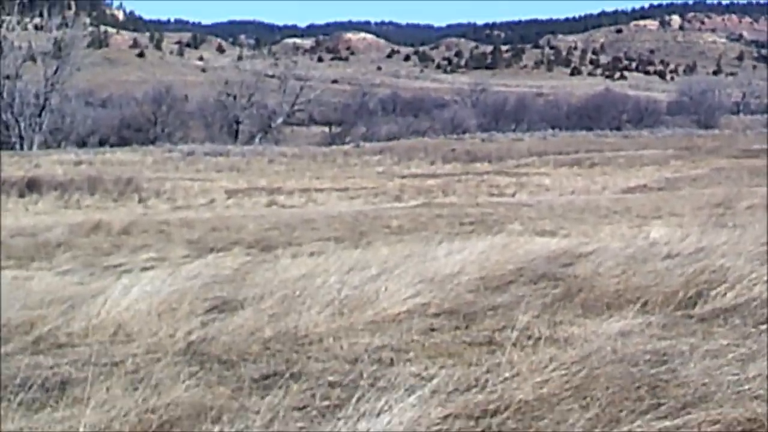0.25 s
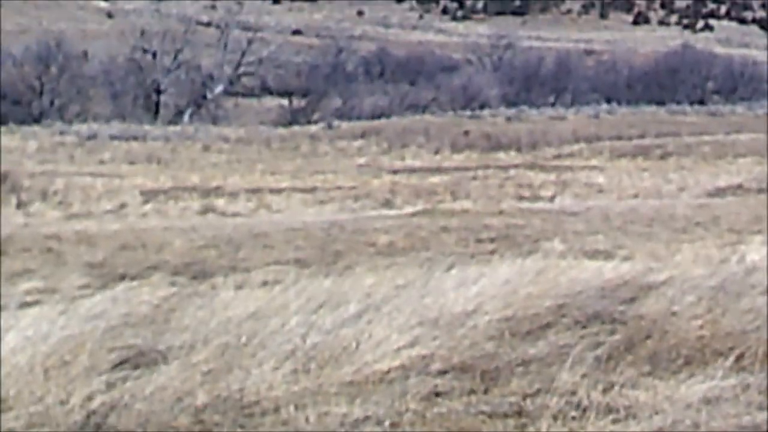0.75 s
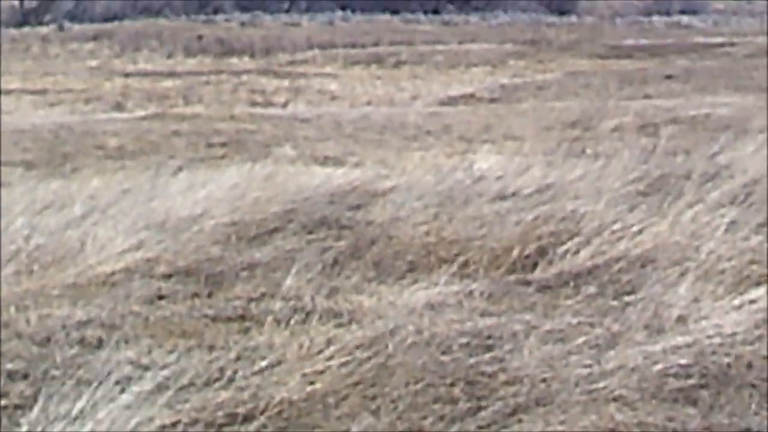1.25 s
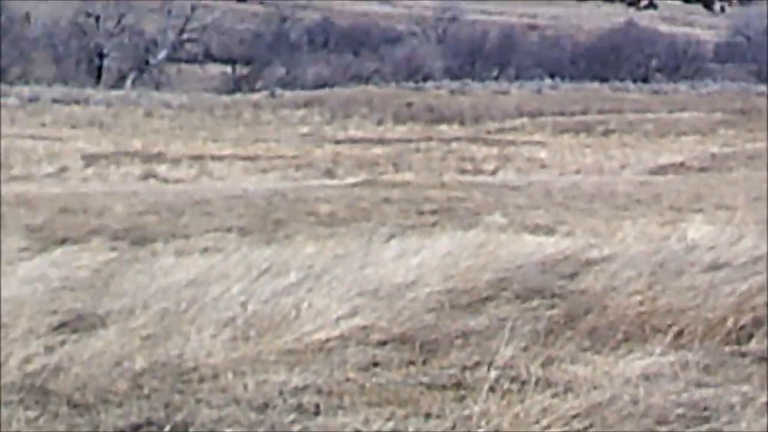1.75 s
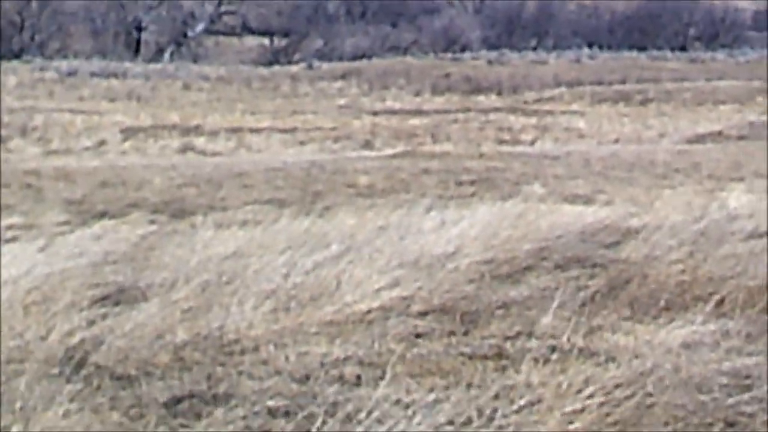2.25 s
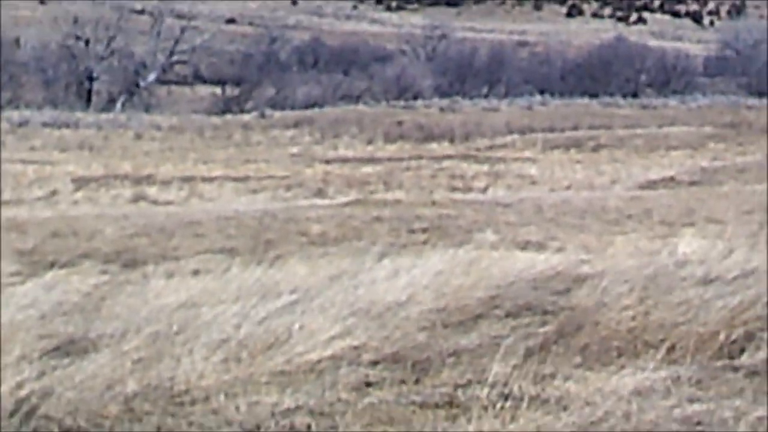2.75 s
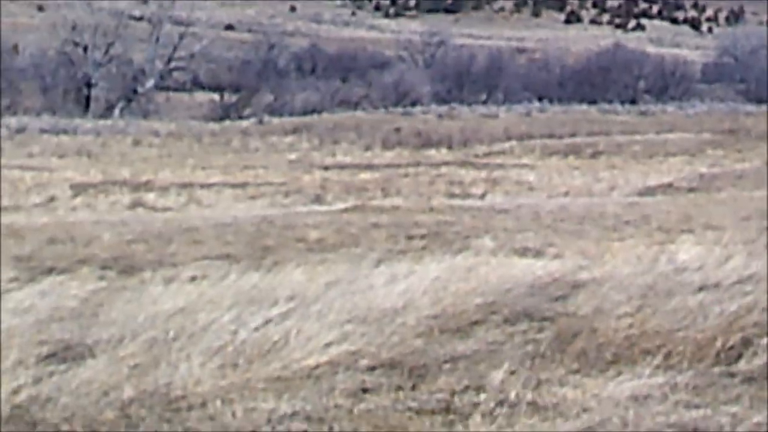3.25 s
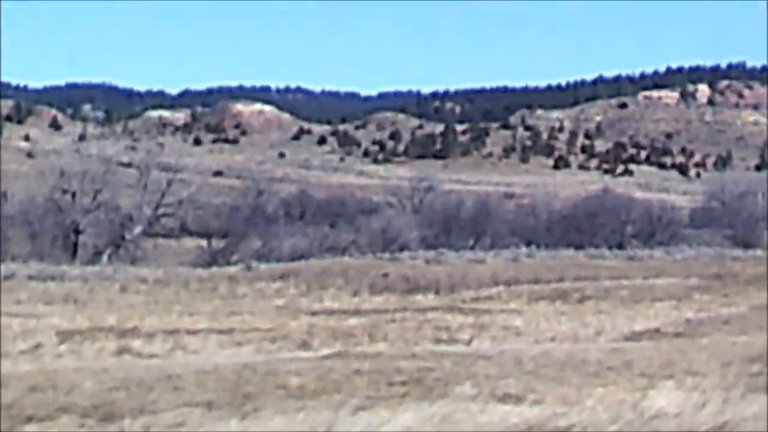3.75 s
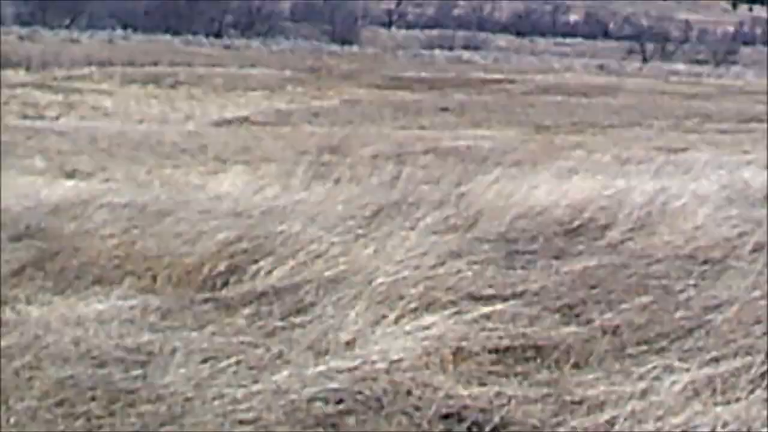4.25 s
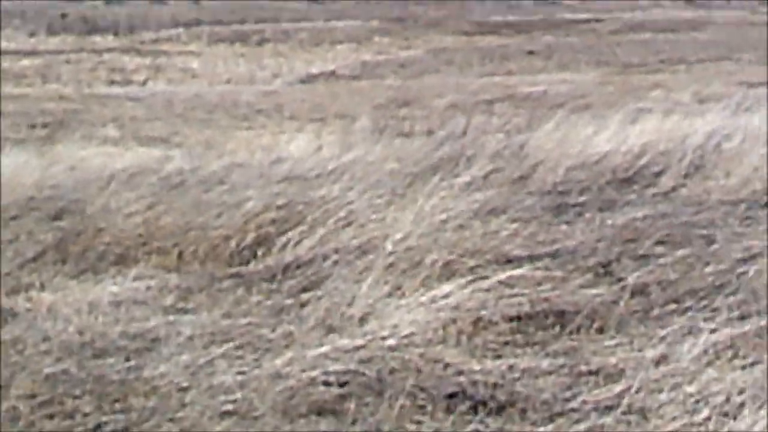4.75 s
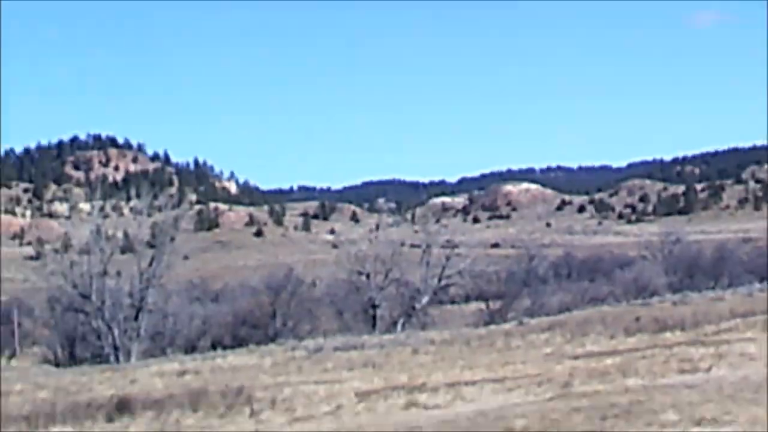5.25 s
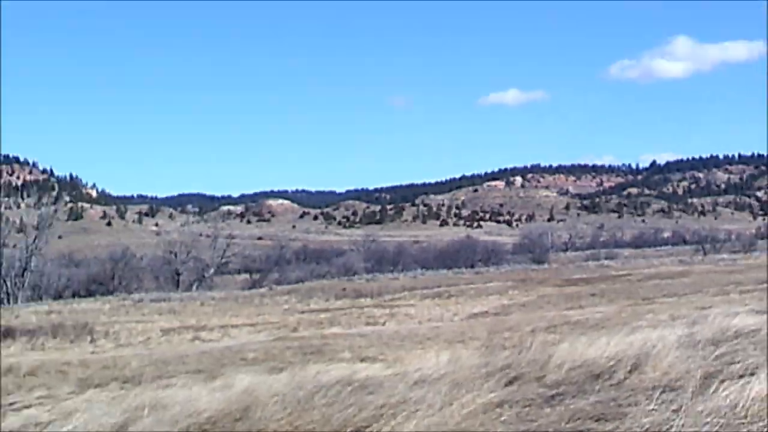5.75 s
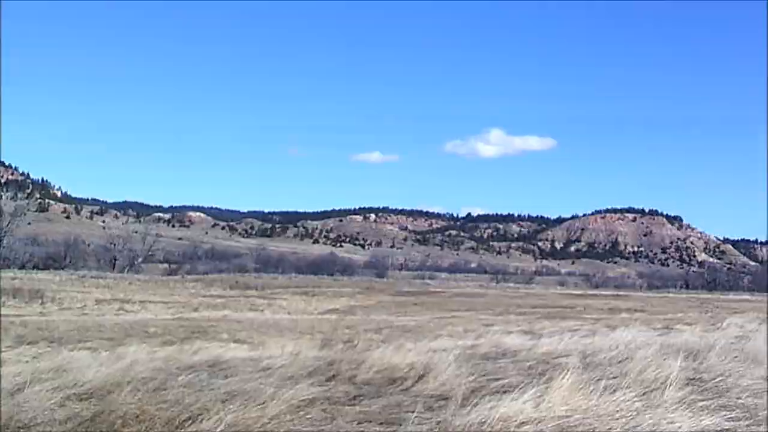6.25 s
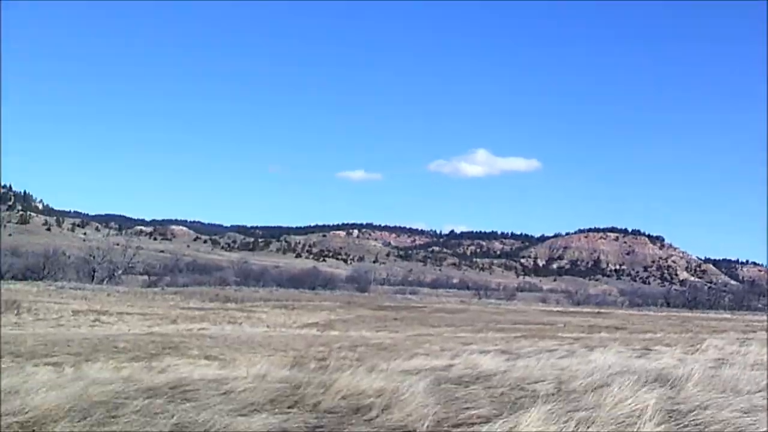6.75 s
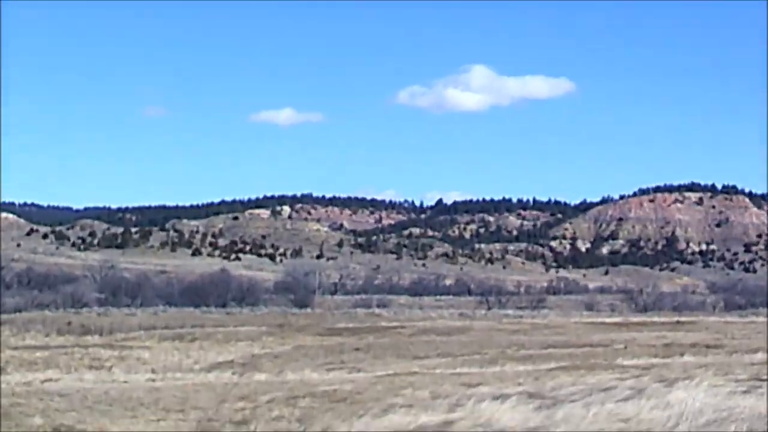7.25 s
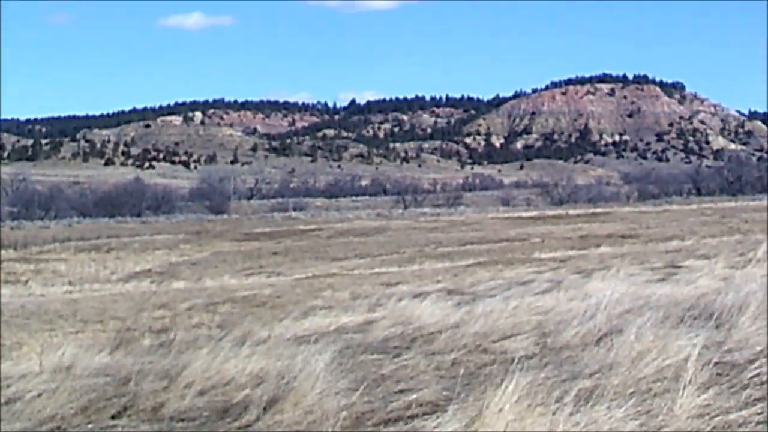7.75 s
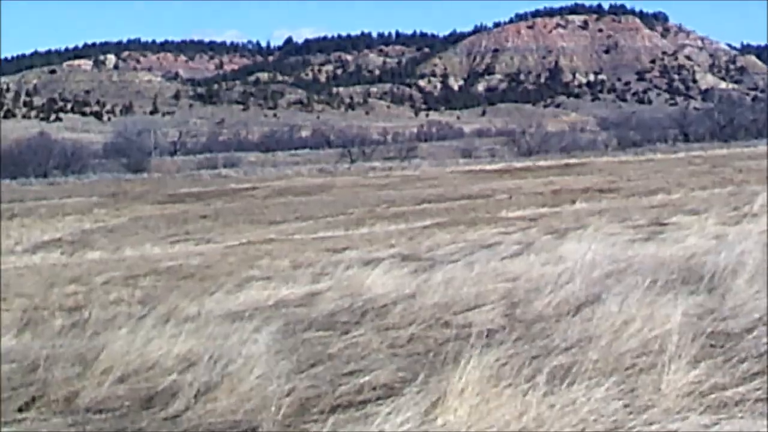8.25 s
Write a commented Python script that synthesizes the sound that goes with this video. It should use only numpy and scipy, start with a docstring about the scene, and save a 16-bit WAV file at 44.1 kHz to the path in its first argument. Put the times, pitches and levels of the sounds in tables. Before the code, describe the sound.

On open prairie, gusty wind hits the bare microphone of a hand-held camera. The first four seconds are a loud, clipped, crackling roar with brief dropouts. It then weakens into ragged puffs and thumps, swells in a second blast after six seconds, and falls away. Fingers rub and tick on the case; dry grass hisses faintly and a distant bird chips near the end.

```python
"""Strong gusty wind on open prairie roars at the microphone port of a hand-held camera.
Swept noise makes the eddies; for four seconds they overload the input into crackle, then the port
turns into the lee and catches a second blast. Sharp pressure dips add thumps.
Fingers rub and tick on the case: noise and snaps ring its resonances. Filtered noise makes the hiss of
dry grass, and near the end gliding sine pairs make the faint chips of a small bird."""
import sys
import numpy as np
from scipy import signal
from scipy.io import wavfile
from scipy.ndimage import uniform_filter1d, map_coordinates

SR = 44100
rng = np.random.default_rng(int(sys.argv[2]) if len(sys.argv) > 2 else 0)


def master_out(mix):
    """Clip the mix to full scale and print it as 16-bit PCM to the path in sys.argv[1]."""
    frames = np.transpose(np.atleast_2d(mix))
    ceiling = np.clip(frames, -1, 1)
    pcm = np.round(ceiling * 32767).astype(np.int16)
    wavfile.write(sys.argv[1], SR, pcm)


N = 374850
TIME = np.arange(N) / SR   # seconds

# Colour of the turbulence at relative speed 1: pitch_hz, density_db (per Hz, relative)
EDDY_COLOUR = [(90, -9), (170, 2), (270, 2), (450, -2), (700, -5.5), (1050, -13), (1500, -24), (2200, -25),
               (3200, -37.5), (5000, -42)]
# Steady wind at the port as the camera turns, before overload: time_s, level_db
WIND_LEVEL = [(0, -7.5), (0.68, -11), (0.9, -7), (1.85, -11.5), (2.62, -12), (2.88, -7), (3.7, -9.5),
              (4.1, -11.5), (4.25, -15), (4.6, -19), (5.38, -20.5), (5.53, -28.5), (5.88, -27.5),
              (6.25, -18), (6.6, -17), (7.45, -18.5), (7.66, -32.5), (8.5, -30.5)]
# How fast eddies sweep over the port: time_s, relative_speed
WIND_SPEED = [(0, 1.0), (1.3, 1.095), (2.0, 0.94), (3.25, 0.96), (3.58, 1.33), (3.8, 1.133), (4.33, 0.99),
              (4.55, 0.68), (5.35, .72), (5.9, .66), (6.65, 0.85), (7.4, 0.75), (8.5, 0.6)]
# Gusts leap out of the steady wind, hold and drop: start_s, hold_s (from the start), rise_db
GUSTS = [(0.376, 0.0447, 4), (0.776, 0.0691, 2), (2.187, 0.07, 4.5), (2.363, 0.075, 3), (3.408, 0.034, 3),
         (3.53, .16, 2.5), (3.917, 0.102, 3), (4.35, .085, 8.5), (4.71, 0.035, 3), (5.278, 0.058, 2),
         (5.972, .035, 11), (6.022, 0.04826, 4), (6.121, 0.024, 10), (6.273, 0.02996, 4),
         (6.489, 0.1106, 3.5), (6.751, 0.13, 4.5), (6.965, 0.015, 3), (7.143, .1, 9), (7.295, 0.1, 9.5),
         (7.424, 0.051, 5), (7.553, 0.041, 8)]
# The flow breaks away from the port and builds up again: start_s, length_s, depth_db
LULLS = [(0.475, 0.073, 19.5), (0.755, 0.031, 3), (1.782, 0.082, 6), (3.465, 0.056, 5), (3.869, .04, 9),
         (4.745, .29, 24), (5.191, .05, 5), (5.419, 0.043, 7), (5.866, 0.0795, 6), (6.163, 0.034, 11.5),
         (6.409, 0.0345, 10), (6.896, .075, 16.5), (7.097, 0.043, 4.5), (7.504, 0.042, 9.5),
         (8.054, 0.064, 7)]
# Single vortices that thump on the port: time_s, suction_db, half_width_s
BUFFETS = [(4.555, 1, 0.00031), (4.735, -4.5, 0.00041), (5.4664, -2.5, 0.00049), (5.4866, -0.5, 0.00019),
           (5.489, -6, .00022), (5.601, -3.5, .0005), (6.008, 0, 0.00022), (6.198, 2.5, 0.0003),
           (6.214, 2, 0.00023), (6.291, 3.5, 0.00024), (6.329, -2, 0.00019), (6.35, 2.5, 0.00023),
           (6.505, -0.5, 0.00057), (6.547, -2, .00024), (6.598, -1.5, 0.00018), (6.765, 7, 0.00044),
           (6.984, 1, .00045), (7.576, -4.5, 0.00015)]
# Fingers slide on the case: hardest_s, swell_s, fade_s, level_db
STROKES = [(4.2, 0.16, .22, -55), (4.45, .1, .08, -42.5), (4.63, 0.13, 0.3, -56.5),
           (4.929, 0.13, 0.065, -55.5), (5.15, 0.21, 0.16, -43), (5.42, 0.029, 0.028, -57),
           (5.74, 0.059, 0.055, -54.5), (5.83, 0.045, 0.066, -47.5), (5.95, 0.052, 0.088, -52),
           (6.23, .17, .22, -58), (6.57, 0.3, 0.16, -55), (6.8, .12, .12, -54), (6.97, 0.12, 0.1, -59),
           (7.96, 0.042, .035, -49), (8.118, 0.05, 0.021, -40.5)]
# The grip ticks on the case: start_s, level_db, sharpness_db (per octave)
TICKS = [(0.138, -21, 6.5), (4.871, -45, 3), (5.152, -33.5, 7), (5.5252, -19, -5), (5.578, -51, 10),
         (5.632, -54, 20), (6.471, -28, 4), (6.850, -28, 2), (7.969, -22.5, -9.5), (8.131, -26, -1.5)]
# Resonances of the case and port, before sharpness tilts them: pitch_hz, width_hz, level_db
CASE_MODES = [(1000, 800, -11), (1540, 380, 0), (2200, 700, -11), (2900, 700, -7), (4080, 600, -14),
              (4680, 700, -18), (9200, 1700, -29), (11000, 1300, -32)]
# Colour of the wind in dry grass and far trees: pitch_hz, density_db (per Hz, relative)
GRASS_COLOUR = [(90, 22), (200, 21), (600, -4.5), (1400, -1), (2600, -26.5), (4000, -43), (6500, -60),
                (11000, -51)]
# Grass level, which swells as a gust crosses the field: time_s, level_db
GRASS_LEVEL = [(0, -31), (4.8, -35.5), (5.6, -50), (7.6, -37), (8.08, -30), (8.2, -23.5), (8.5, -27)]
# Bird chips: start_s, base_pitch_hz, level_db
CHIPS = [(7.055, 6100, -72), (7.571, 6100, -68), (7.739, 5680, -75), (7.983, 5555, -74), (8.279, 5520, -76)]
# One chip flicks up and slides down: age_s, pitch_ratio, strength (0-1)
CHIP_SHAPE = [(0, 1.1, 0.02), (.006, 1.15, .6), (.012, 1.02, 1), (.03, .97, 1), (.039, 0.93, 0.3)]

GUST_ATTACK_S, GUST_RELEASE_S = 0.01615, 0.0252
LULL_FALL_S, LULL_CURVE = 0.02037, 1.8   # breaks away fast, returns slowly at first
SWAY_DB, SWAY_HZ = .5, 11.96             # the wind is never quite even
SPEED_DB_PER_DB = 0.14                   # a gust is also a little faster, a lull slower
HOLD_DB = -69.5                          # the hand is never quite still
OVERLOAD = 0.45                          # input ceiling, linear amplitude
CUTOFF_HZ = 11800


def wind(jerk_level_db=1.5, jerk_speed_db=2.0):
    """A frozen pattern of eddies sweeps past at a jerky speed: each jerk is both louder and higher."""
    jerk = jerks()
    surge_db = surges()
    speed_change_db = jerk_speed_db * jerk + SPEED_DB_PER_DB * surge_db
    speed = np.abs(in_time(WIND_SPEED)) * from_db(speed_change_db)
    position = np.cumsum(speed)   # in samples of the frozen pattern
    eddies = map_coordinates(coloured_noise(EDDY_COLOUR), [position], order=3, mode="mirror")
    pressure = eddies * flutter(jerk_level_db, jerk)
    level = from_db(in_time(WIND_LEVEL) + surge_db)
    return level * pressure / np.std(low_cut(pressure))   # levelled by what the microphone passes


def jerks(rate_hz=190.0, release_per_s=520.0, limit=2.2):
    """Jerks of the flow come abruptly, ebb in a few milliseconds and are bounded; spread 1."""
    ebb = release_per_s * TIME
    swirl = np.maximum.accumulate(drift(rate_hz) + ebb) - ebb   # peak follower with a steady fall
    slow_swell = uniform_filter1d(swirl, size=SR // 16)         # left to the gusts
    swirl = rms_one(swirl - slow_swell)
    return rms_one(np.tanh(swirl / limit))


def surges():
    """Gusts and lulls in dB around the steady wind, with a slight random sway."""
    surge_db = SWAY_DB * drift(SWAY_HZ)
    for start, hold, rise_db in GUSTS:
        age = TIME - start
        attack = age / GUST_ATTACK_S
        release = 1 - (age - hold) / GUST_RELEASE_S
        surge_db = surge_db + rise_db * np.clip(np.minimum(attack, release), 0, 1)
    for start, length, depth_db in LULLS:
        age = TIME - start
        fallen = np.clip(age / LULL_FALL_S, 0, 1)
        recovered = np.interp(age, [LULL_FALL_S, length], [0, 1])
        surge_db = surge_db - depth_db * fallen * (1 - recovered ** LULL_CURVE)
    return surge_db


def buffets():
    """The core of each passing vortex is a brief dip in pressure."""
    suction = 0
    for centre, db, half_width in BUFFETS:
        suction = suction + from_db(db) / (1 + ((TIME - centre) / half_width) ** 2)
    return -suction


def port(x, corner_hz=2550.0):
    """Eddies smaller than the port cancel out across it, which dulls the roar."""
    return signal.sosfilt(signal.butter(3, corner_hz, fs=SR, output="sos"), x)


def rubbing(grain_db=2.5, grain_hz=200.0, sharpness_db=7.0):
    """Skin slides over the case in tiny uneven slips, which set it ringing."""
    friction = rng.standard_normal(N) * flutter(grain_db, drift(grain_hz))
    return strokes() * rms_one(case(friction, sharpness_db))


def strokes():
    """The force of the fingers: each stroke swells and fades over the resting hold."""
    force = from_db(HOLD_DB)
    for hardest, swell, fade, db in STROKES:
        shape = np.interp(TIME - hardest, [-swell, 0, fade], [0, 1, 0])
        force = force + from_db(db) * shape ** 1.66
    return force


def ticks(slip_s=0.0017, slip_db=-17.5):
    """Each tick is a snap and a brief slip after it, which set the case ringing."""
    out = np.zeros(N)
    age = TIME[:SR // 20]
    for start_s, db, sharpness_db in TICKS:
        slip = from_db(slip_db) * rng.standard_normal(len(age)) * np.exp(-age / slip_s)
        snap = age == 0
        tick = case(snap + slip, sharpness_db)
        start = round(start_s * SR)
        onset_level = np.std(tick[age < .004])
        out[start:start + len(age)] += from_db(db) * tick / onset_level
    return out


def case(force, sharpness_db=0):
    """The case and port ring in their resonances; a sharper contact favours the high ones."""
    out = 0
    for hz, width, db in CASE_MODES:
        r = np.exp(-np.pi * width / SR)   # pole radius: a wider mode dies sooner
        gain = (1 - r * r) / 2
        resonance = [gain, 0, -gain, 1, -2 * r * np.cos(2 * np.pi * hz / SR), r * r]
        mode = signal.sosfilt([resonance, resonance], force)   # passed twice: deep valleys between peaks
        octaves_up = np.log2(hz / CASE_MODES[0][0])
        out = out + mode * from_db(db + sharpness_db * octaves_up)
    return out


def grass():
    """Wind in the field hisses softly and smoothly as coloured noise."""
    return from_db(in_time(GRASS_LEVEL)) * coloured_noise(GRASS_COLOUR)


def bird(upper_db=-7.0):
    """Short far chips glide in pitch, with a weaker partial a fifth above."""
    age, ratio, strength = np.transpose(CHIP_SHAPE)
    out = 0
    for start, hz, db in CHIPS:
        pitch = hz * np.interp(TIME - start, age, ratio)
        phase = 2 * np.pi * np.cumsum(pitch) / SR
        level = from_db(db) * np.interp(TIME - start, age, strength, left=0, right=0)
        out = out + level * (np.sin(phase) + from_db(upper_db) * np.sin(1.5 * phase))
    return out


def coloured_noise(spectrum):
    """Half-octave bands of noise, each at the level of the spectrum; unit power."""
    points = np.array(spectrum)
    edges = 64 * 2 ** np.arange(0, 8, .5)   # Hz
    out = 0
    for low, high in zip(edges, edges[1:]):
        band = signal.butter(4, [low, high], "band", fs=SR, output="sos")
        log_centre = np.log(low * high) / 2
        db = np.interp(log_centre, np.log(points[:, 0]), points[:, 1], right=-np.inf)
        out = out + from_db(db) * signal.sosfilt(band, rng.standard_normal(N))
    return rms_one(out)


def drift(rate):
    """Smooth chance that changes about `rate` times a second; spread 1."""
    r = np.exp(-2 * np.pi * rate / SR)
    noise = rng.standard_normal(N + SR)   # the first second only settles the filter
    return rms_one(signal.lfilter([1], [1, -2 * r, r * r], noise)[SR:])


def flutter(depth_db, chance):
    """A log-normal gain of unit power."""
    return rms_one(from_db(depth_db * chance))


def in_time(rows):
    """Join (time_s, value) rows by straight lines."""
    return np.interp(TIME, *np.transpose(rows))


def from_db(db):
    """Decibels to gain."""
    return 10 ** (np.asarray(db) / 20)


def rms_one(x):
    """Scale to unit power."""
    return x / np.sqrt(np.mean(x ** 2) + 1e-20)


def low_cut(x, corner_hz=195.3):
    """The microphone passes little of the deep bass."""
    return signal.sosfilt(signal.butter(3, corner_hz, "high", fs=SR, output="sos"), x)


def scene():
    """Wind and handling at the microphone, the field and a bird behind them."""
    roar = port(wind() + buffets())
    handling = rubbing() + ticks()
    background = grass() + bird()
    return (roar + handling + background)[None, :]


def record(dry, hardness=44.0, coupling_hz=29.3):
    """After the low cut the input overloads into flat tops, which crackle and rumble; the top is cut."""
    pressure = low_cut(dry)
    clipped = pressure / (1 + np.abs(pressure / OVERLOAD) ** hardness) ** (1 / hardness)
    coupling = signal.butter(1, coupling_hz, "high", fs=SR, output="sos")
    coupled = signal.sosfilt(coupling, clipped)
    steep = signal.firwin(161, CUTOFF_HZ, window=("kaiser", 8), fs=SR)
    return signal.fftconvolve(coupled, steep[None, :], mode="same")


dry = scene()
out = record(dry)
master_out(out)
```